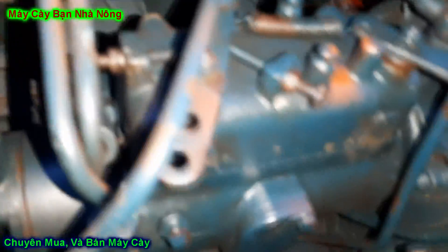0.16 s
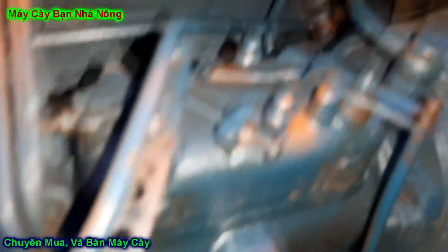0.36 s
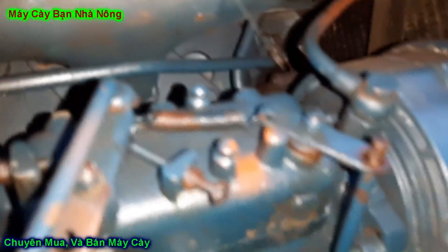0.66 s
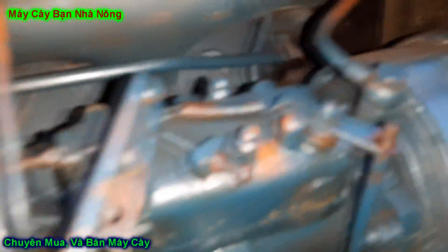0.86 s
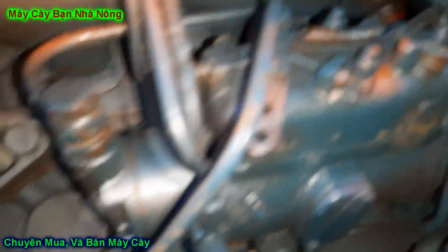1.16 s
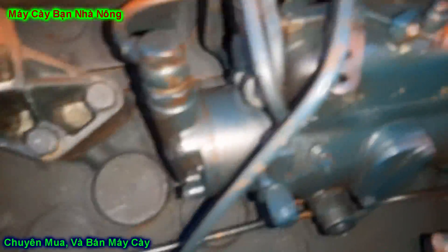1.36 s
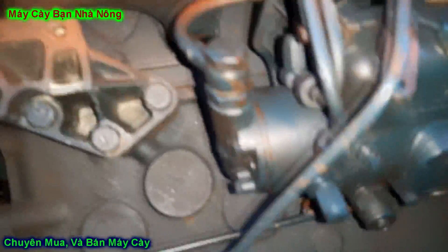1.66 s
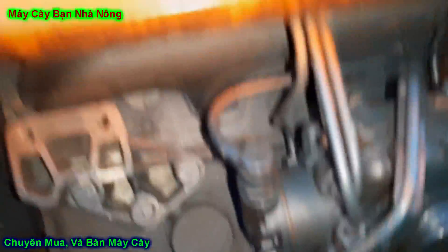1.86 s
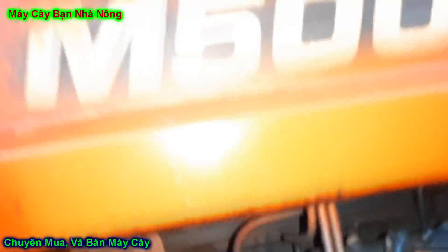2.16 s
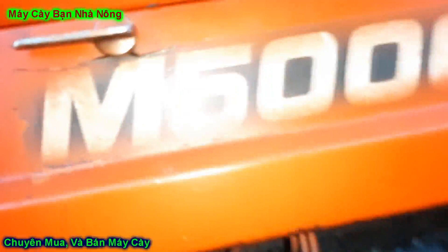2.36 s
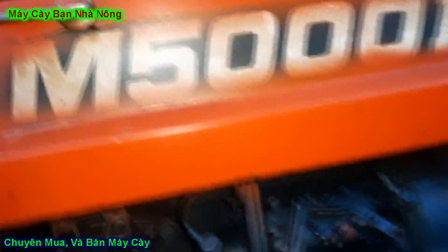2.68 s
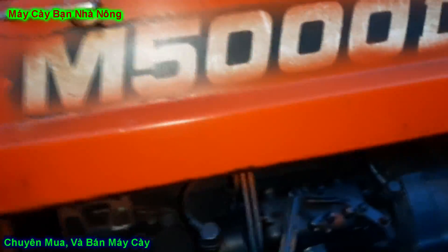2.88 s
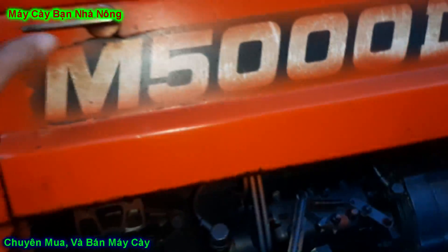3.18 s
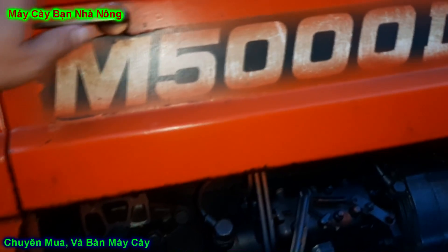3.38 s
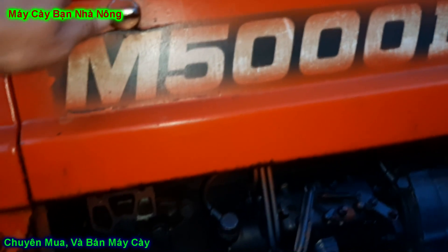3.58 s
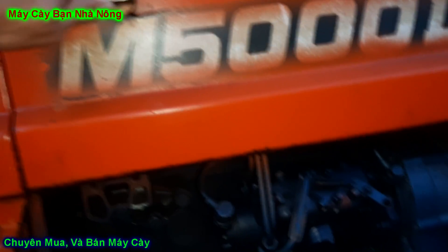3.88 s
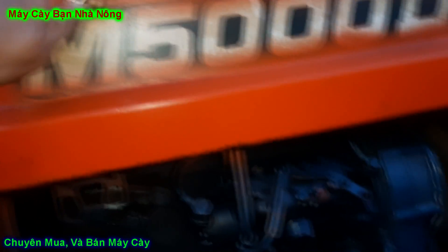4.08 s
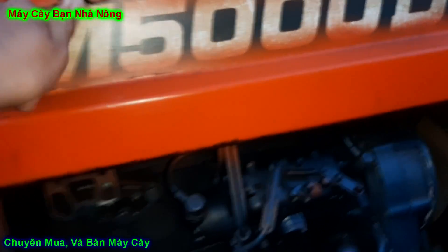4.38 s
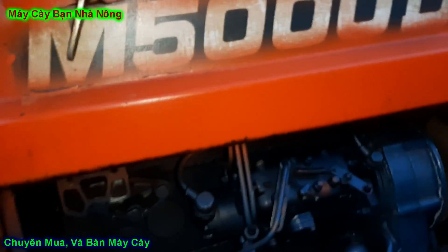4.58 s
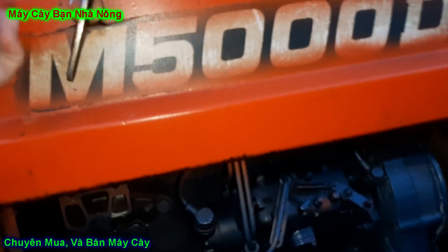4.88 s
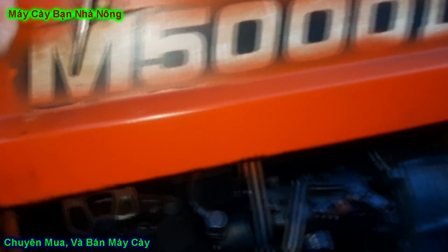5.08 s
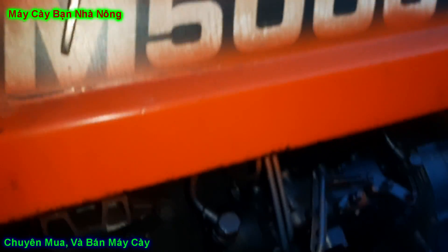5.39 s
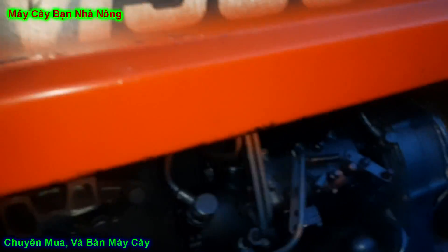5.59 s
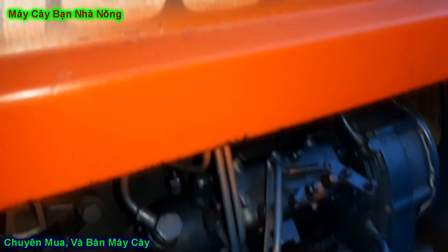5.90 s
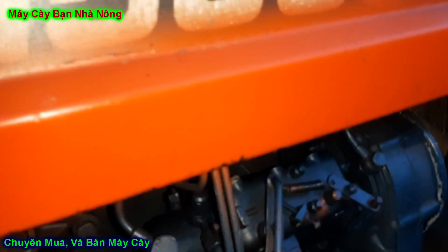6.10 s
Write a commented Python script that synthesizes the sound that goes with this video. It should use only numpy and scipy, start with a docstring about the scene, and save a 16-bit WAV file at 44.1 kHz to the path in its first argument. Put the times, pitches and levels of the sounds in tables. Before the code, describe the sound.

Close handheld stereo pickup outdoors, with a short scatter from sheds. Thin rising bird chirps recur throughout, leaning left, over distant twitter, husky fowl calls and a faint low hum. A few dry ticks and faint rustles precede one hollow, quickly damped metal knock past the middle. A much fainter tap follows, then a crunchy scuff and low footfall close the scene.

```python
"""A farmyard in daylight, heard in stereo: filtered noise and wavering tones make a low machine rumble and yard wash
under a faint hum, twitter of short far glides and hoarse, muttering fowl (noisy lines round a throat resonance).
Early on come brushes and a faint high rattle (banded noise) and grit cracks (short bursts), then a small bird's
rising chirps, single bird notes and low thin tones of the far fowl (all near-pure tones). From about 4 s a hand
knocks on a sheet-metal hood (ringing modes); near 6 s a shoe scuffs and lands on grit with a low thud (banded
noise and bursts). Sheds and machines scatter the sounds as a short noise tail."""
import sys
import numpy as np
from scipy import signal
from scipy.fft import rfft, irfft
from scipy.io import wavfile

SR = 44100
rng = np.random.default_rng(int(sys.argv[2]) if len(sys.argv) > 2 else 0)


def put_to_file(sound):
    """Save the sound as 16-bit audio at rate SR, in the file named by the first command-line argument."""
    columns = np.atleast_2d(sound).T  # one column per channel
    safe = np.clip(columns, -1, 1)
    whole_steps = np.round(safe * 32767)
    wavfile.write(sys.argv[1], SR, whole_steps.astype(np.int16))


N = 275272

# the small bird's rising chirps, one curve each: (t/s, f/Hz, level/dB)
CHIRP_CURVES = [
    [(0.357, 3560, -53), (0.38, 3870, -64.0), (0.404, 4120, -64.0), (0.429, 4430, -57), (0.452, 4800, -67),
     (0.476, 4880, -59), (0.501, 5380, -57), (0.523, 6050, -61), (0.546, 6770, -52.5)],
    [(0.718, 4110, -69), (0.739, 4300, -57), (0.762, 4530, -62.0), (0.785, 4740, -64), (0.806, 4910, -75),
     (0.83, 5300, -54), (0.853, 5280, -67), (0.874, 6040, -69), (0.895, 6620, -66.0)],
    [(1.121, 3350, -66), (1.15, 3790, -66), (1.181, 4090, -65), (1.212, 4400, -71), (1.24, 4690, -73),
     (1.272, 4880, -65.0), (1.303, 5200, -65), (1.331, 6000, -68), (1.36, 6600, -67.5)],
    [(1.457, 3950, -73.0), (1.478, 4120, -70), (1.502, 4290, -65), (1.525, 4604, -65), (1.546, 4890, -62),
     (1.569, 5240, -59.0), (1.592, 5540, -57.0), (1.614, 5870, -65), (1.635, 6100, -55)],
    [(2.213, 4214, -58.0), (2.232, 4340, -59.0), (2.252, 4570, -60), (2.273, 4820, -65), (2.292, 5090, -62),
     (2.312, 5310, -62), (2.332, 5890, -64), (2.351, 6340, -65), (2.37, 6820, -72)],
    [(2.516, 3330, -70), (2.54, 3720, -57.5), (2.566, 4046, -59), (2.592, 4230, -58.0), (2.616, 4510, -56),
     (2.641, 4930, -61), (2.667, 5286, -50), (2.691, 5840, -52), (2.715, 6680, -50.5)],
    [(2.722, 3860, -62.0), (2.74, 4000, -50), (2.76, 4205, -65), (2.779, 4450, -56), (2.797, 4554, -68),
     (2.816, 4870, -58), (2.836, 5260, -69), (2.854, 5890, -60), (2.872, 6400, -64)],
    [(3.223, 4060, -54), (3.246, 4250, -58), (3.27, 4500, -59.0), (3.295, 4710, -55), (3.318, 4640, -70),
     (3.342, 4800, -66), (3.367, 5100, -64), (3.389, 6000, -54), (3.412, 6410, -57.0)],
    [(3.662, 4400, -64.0), (3.674, 4370, -63), (3.688, 4690, -68.0), (3.701, 5170, -69.0),
     (3.713, 5530, -65), (3.726, 6060, -61), (3.74, 6170, -58), (3.752, 6610, -56), (3.764, 7230, -63)],
    [(4.386, 3530, -62), (4.409, 3700, -65), (4.433, 4070, -59), (4.458, 4520, -52), (4.48, 4700, -51),
     (4.505, 4940, -57), (4.53, 5300, -58), (4.552, 6170, -58), (4.575, 7080, -52)],
    [(4.937, 4130, -67.0), (4.949, 4230, -70), (4.963, 4550, -62), (4.976, 4710, -65.0), (4.988, 4830, -64),
     (5.002, 5020, -65.0), (5.015, 5340, -68), (5.028, 5880, -59), (5.04, 6300, -55)],
    [(5.066, 3530, -57), (5.092, 3820, -61), (5.12, 4110, -57), (5.148, 4380, -60), (5.174, 4650, -57.0),
     (5.201, 4800, -53.5), (5.229, 5210, -59), (5.255, 5970, -63), (5.281, 6650, -56)],
    [(5.242, 3370, -58), (5.266, 3750, -56.5), (5.293, 4070, -56), (5.319, 4370, -63), (5.344, 4550, -56),
     (5.37, 4840, -48.5), (5.396, 5220, -56), (5.421, 5810, -53), (5.445, 6760, -54.0)],
]


def from_db(db):
    """Decibels to an amplitude factor."""
    return 10 ** (np.asarray(db) / 20)


def rms_one(x):
    """Scale to an rms of 1."""
    return x / np.sqrt(np.mean(x ** 2) + 1e-20)


def in_time(rows):
    """Table columns joined by straight lines in time."""
    s, *columns = np.transpose(rows)
    return [np.interp(np.arange(N) / SR, s, column) for column in columns]


def at_hz(points, hz):
    """Read a curve at a frequency, straight over log frequency."""
    curve_hz, values = np.array(points)[:, 0], np.array(points)[:, 1]
    return np.interp(np.log(hz), np.log(np.maximum(curve_hz, 1)), values)


def drift(rate_hz):
    """Random wander of rms about 1: coarse noise through two equal one-pole low-passes at rate_hz."""
    step = 40  # samples between coarse points
    r = np.exp(-2 * np.pi * rate_hz * step / SR)
    coarse = rng.standard_normal(N // step + 2002)
    slow = signal.lfilter([1], [1, -2 * r, r * r], coarse)[2000:]  # skip the filter's settling
    return np.interp(np.arange(N) / step, np.arange(len(slow)), rms_one(slow))


def wavering(hz, width_hz):
    """A narrow band of noise around one pitch: two drifting amplitudes in quadrature; rms 1."""
    turn = 2 * np.pi * hz * np.arange(N) / SR
    return rms_one(drift(width_hz) * np.sin(turn) + drift(width_hz) * np.cos(turn))


def banded_noise(spectrum, patchy_db, flicker_hz):
    """Diffuse stereo noise in third-octave bands, each with its own level, flicker and likeness; rms 1."""
    # left-right correlation of the diffuse field: (f/Hz, likeness from -1 to 1)
    likeness = [(60, 1), (130, 0.95), (290, 0.84), (640, 0.05), (1410, -0.33), (3100, -0.044),
                (6820, -0.085), (15000, 0.015)]
    lowest, highest = spectrum[0][0], spectrum[-1][0]
    edges = np.geomspace(lowest, highest, round(3 * np.log2(highest / lowest)) + 1)
    out = 0
    white = rng.standard_normal((2, 2, N))  # neighbouring bands draw on different noise
    for k, (low, high) in enumerate(zip(edges, edges[1:])):
        band = signal.butter(2, [low, high], "band", fs=SR, output="sos")
        mid, side = signal.sosfilt(band, white[k % 2])
        hz = np.sqrt(low * high)
        alike = np.clip(at_hz(likeness, hz), -1, 1)
        gain = from_db(at_hz(spectrum, hz) + patchy_db * drift(flicker_hz))
        out = out + gain * (np.sqrt(1 + alike) * mid + np.sqrt(1 - alike) * side * [[1], [-1]])
    return rms_one(out)


def piping(calls, flutter_db, waver, grain_db):
    """Near-pure tones; leaves and sheds on the way flutter level and pitch, and a fast rasp roughens them."""
    out = np.zeros(N)
    flutter, wobble, rasp = drift(60), drift(90), drift(260)
    for call in calls:
        a, b = round(call[0][0] * SR), min(round(call[-1][0] * SR), N)
        t = np.arange(a, b) / SR
        s, hz, db = np.transpose(call)
        pitch_hz = np.interp(t, s, hz) * (1 + waver * wobble[a:b])
        phase = 2 * np.pi * np.cumsum(pitch_hz) / SR
        fade = np.clip(np.minimum((t - s[0]) / .016, (s[-1] - t) / .008), 0, 1)  # 16 ms in, 8 ms out
        level_db = np.interp(t, s, db) + flutter_db * flutter[a:b] + grain_db * rasp[a:b]
        out[a:b] += fade * from_db(level_db) * np.sqrt(2) * np.sin(phase)
    return out


def drone():
    """The far machine's tones, each a narrow wavering band, alike at both ports."""
    # tones: (f/Hz, width/Hz, level/dB re the rumble noise)
    machine_tones = [(66.1, 6.6, -14), (100.8, 3.4, -13), (126.1, 3.16, -4), (383, 10, -22.5)]
    return sum(from_db(db) * wavering(hz, width_hz) for hz, width_hz, db in machine_tones)


def machine_rumble(level_db):
    """Low diffuse noise with the machine's tones inside it, swelling together."""
    # noise colour: (f/Hz, relative density/dB per Hz)
    rumble_colour = [(12, -77), (25, -29), (53, -8), (128, 6.5), (143, 5), (199, -5), (260, -35),
                     (340, -30.5), (570, -120)]
    return from_db(level_db) * (banded_noise(rumble_colour, patchy_db=1.0, flicker_hz=2.8) + drone())


def yard_wash(level_db):
    """The yard's mid-range wash: diffuse noise with slowly flickering bands."""
    # noise colour: (f/Hz, relative density/dB per Hz)
    wash_colour = [(110, -40), (190, -7), (303, -3), (433, -4), (477, -6), (591, -4.5), (724, -15),
                   (964, -11), (1200, -13), (1910, -11), (3300, -31.5), (4290, -52), (7260, -120)]
    return from_db(level_db) * banded_noise(wash_colour, patchy_db=2.5, flicker_hz=3.7)


def twitter_bed(level_db):
    """Twitter blurred into a diffuse treble noise whose bands flicker fast."""
    # noise colour: (f/Hz, relative density/dB per Hz)
    twitter_colour = [(1530, -85), (2600, 7), (3280, 4), (4540, 8.5), (6090, 0.5), (7050, 3), (8250, -43.5),
                      (9500, -21), (12400, -63), (20900, -120)]
    return from_db(level_db) * banded_noise(twitter_colour, patchy_db=3.0, flicker_hz=22.0)


def hiss():
    """A steady faint hiss of diffuse treble noise."""
    # noise colour: (f/Hz, relative density/dB per Hz)
    hiss_colour = [(4410, -6), (7500, -6.5), (8190, -51), (9350, -30), (11000, -17), (13000, -16.5),
                   (15900, -19.5)]
    return from_db(-69) * banded_noise(hiss_colour, patchy_db=1.5, flicker_hz=8.3)


def hum():
    """A faint wavering hum, a narrow noise band that swells, sinks almost away and creeps back."""
    # fader moves: (t/s, level/dB)
    hum_fader = [(0, -69.5), (.3, -67.5), (1.0, -75), (1.5, -65.5), (2.0, -78), (2.6, -88), (6.24, -77)]
    level_db, = in_time(hum_fader)
    return from_db(level_db) * wavering(hz=585, width_hz=31)


def flock(count):
    """Far sparrows: short glides up or down at random moments, within a few dB of each other; rms 1."""
    # start s, length s, start Hz, end/start pitch ratio, level dB
    spans = [N / SR - .1, .04, 2300, .4, 5]
    lowest = [0, .02, 3600, .82, 0]
    draws = rng.random((count, 5)) * spans + lowest
    calls = [[(s, hz, db), (s + length, hz * glide, db)] for s, length, hz, glide, db in draws]
    return rms_one(piping(calls, flutter_db=3, waver=.02, grain_db=4))


def hoarse(hz, low_db):
    """A husky voice: wavering lines round the throat resonance in a band of breath, and a low partial."""
    turn = 2 * np.pi * np.cumsum(hz) / SR

    def line(ratio, rate_hz):
        return rms_one(drift(rate_hz) * np.sin(ratio * turn) + drift(rate_hz) * np.cos(ratio * turn))

    core, upper, lower = line(.95, 30), line(1.09, 40), line(.84, 40)
    breath = line(1.0, 320)
    low = line(.4, 40)  # more than an octave below
    lines = from_db(-8) * core + from_db(-11) * (upper + lower)
    return lines + from_db(-6.5) * breath + from_db(low_db - 10.0) * low


def fowl():
    """Far hoarse calls swell, hold and die away, gliding in pitch; the flock mutters on below."""
    # calls: (start t/s, length/s, throat f/Hz at start, f/Hz at end, relative level/dB,
    #         relative low-partial level/dB)
    fowl_calls = [(0.235, 0.11, 2710, 2704, -59, -20), (0.444, .16, 2345, 2294, -68, -10),
                  (0.666, 0.2, 2297, 2412, -64, 10), (0.847, 0.23, 2703, 2597, -71, -20),
                  (1.201, 0.18, 2566, 2500, -61.5, -11), (1.5, 0.17, 2277, 2010, -58.5, 5),
                  (1.658, 0.19, 2253, 2148, -59.5, -3), (1.899, 0.32, 1748, 1801, -55, -5),
                  (2.134, 0.33, 1954, 2033, -55.5, -12), (2.499, 0.4, 1994, 1780, -54.5, -23),
                  (2.818, 0.32, 1669, 1698, -56.5, -26), (3.816, 0.14, 1830, 1760, -57, -14),
                  (4.744, 0.11, 2250, 2237, -59.5, -10), (4.904, 0.15, 1938, 2160, -56.5, -18),
                  (5.123, 0.17, 2260, 1830, -81, 9), (6.13, 0.14, 1550, 1640, -64, -5)]
    attack_s, release_s = 0.12, 0.24
    t, gain = np.arange(N) / SR, np.zeros(N)
    s, length, from_hz, to_hz, db, low_db = np.transpose(fowl_calls)
    for start, end, top in zip(s, s + length, from_db(db)):
        ramp = np.minimum((t - start) / attack_s, (end - t) / release_s)
        swell = np.clip(ramp + .5, 0, 1) ** 2  # ramps are half-way up at start and end
        gain = np.maximum(gain, top * swell)
    ends = np.ravel([s, s + length - 1e-3], "F")
    throat_hz = np.interp(t, ends, np.ravel([from_hz, to_hz], "F"))
    calls = gain * hoarse(throat_hz, np.interp(t, ends, np.repeat(low_db, 2)))
    mutter = hoarse(2137 * (1 + .08 * drift(4)), low_db=7.0)
    mutter_db = -72 + 5 * drift(3.3)
    return calls + from_db(mutter_db) * mutter


def noise_swells():
    """Brushes, scuffs, a faint high rattle and a low thud: filtered noise under a smooth swell."""
    # swells: (middle t/s, length/s, rms level at the top/dB, centre f/Hz, width/octaves)
    swells = [(0.252, 0.081, -75, 11000, 0.3), (.62, 1, -75.5, 10500, 0.16),
              (1.587, 0.19, -68.5, 10800, 0.85), (2.048, 0.39, -66, 11640, 1.6),
              (2.8, 0.61, -74.5, 12100, 0.23), (3.996, 0.081, -62.5, 11900, 0.22),
              (3.947, 0.02, -55, 1190, 0.32), (3.98, 0.1, -58.5, 3500, 0.81),
              (4.268, 0.095, -63.5, 11340, 0.3), (5.135, 0.03, -53, 1169, 1.7),
              (5.959, 0.069, -50.5, 1010, 1.05), (5.96, 0.035, -55.5, 8000, 2.6),
              (5.993, 0.053, -40.5, 243, 0.15), (5.996, 0.036, -48, 1150, 0.26),
              (5.997, 0.025, -50, 3070, 0.67), (6.015, 0.076, -47.5, 637, 0.15),
              (5.96, 0.056, -60, 1490, 0.18)]
    t, out = np.arange(N) / SR, np.zeros(N)
    grains = rng.standard_normal(N) * from_db(2.0 * drift(90))
    for s, length, db, centre_hz, octaves in swells:
        near = np.abs(t - s) < 1.5 * length
        count = near.sum()
        octaves_off = np.log2((np.fft.rfftfreq(count, 1 / SR) + 1) / centre_hz)
        colour = np.exp(-.5 * (octaves_off / octaves) ** 2)
        filtered = rms_one(irfft(rfft(grains[near]) * colour, count))
        swell = np.exp(-.5 * ((t[near] - s) / (length / 2.4)) ** 2)
        out[near] += from_db(db) * swell * filtered
    return out


def ticks():
    """Grit cracks: a band-passed noise burst that dies within milliseconds."""
    # cracks: (t/s, relative level/dB, decay to 1/e in ms)
    cracks = [(.232, -60, 1.0), (.579, -54, 1.0), (1.1356, -39, 1.4), (2.771, -37, 1.5),
              (5.9566, -32, 1.29), (5.962, -36, 1.5), (5.9823, -26.5, 4.5), (6.2273, -33.5, 0.84)]
    out, t_ms = np.zeros(N), np.arange(900) / SR * 1000
    for s, db, decay_ms in cracks:
        at = round(s * SR)
        burst = rng.standard_normal(len(t_ms)) * np.exp(-t_ms / decay_ms) * from_db(db - 5)
        out[at:at + len(t_ms)] += burst[:N - at]
    return signal.lfilter(*signal.butter(1, [900, 6000], "band", fs=SR), out)


def chirps():
    """Each chirp climbs slowly, flicks up to its top and slips down again in a fainter husky blur."""
    drop_s, drop_ratio, drop_db = 0.035, 0.51, -3
    climbs = piping(CHIRP_CURVES, flutter_db=2, waver=.011, grain_db=3.5)
    drops = [[(s, hz, db + drop_db), (s + drop_s, hz * drop_ratio, db + drop_db - 8.5)]
             for *_, (s, hz, db) in CHIRP_CURVES]
    return climbs + piping(drops, flutter_db=3, waver=.05, grain_db=5)


def single_notes():
    """Single notes of birds, and low thin tones of the far fowl: near-pure tones on straight glides."""
    # notes: (start t/s, length/s, start f/Hz, end f/Hz, level/dB)
    glides = [(.39, .025, 5150, 5180, -68), (1.4, 0.08, 592, 605, -68), (1.73, .24, 815, 800, -72),
              (2.01, .09, 810, 790, -72), (1.749, .16, 1615, 1620, -71), (2.11, 0.19, 725, 690, -67),
              (1.885, .07, 5420, 5420, -66), (1.97, .28, 5480, 5620, -72), (2.015, .05, 4800, 4450, -66),
              (3.522, 0.045, 5600, 5950, -64), (3.532, .05, 6200, 6400, -64), (1.95, .07, 1700, 1640, -66),
              (2.62, .1, 1830, 1790, -65), (2.66, .07, 2010, 1990, -66), (2.93, .1, 1620, 1590, -66),
              (3.667, 0.1, 3850, 3510, -70), (3.652, .035, 4450, 4200, -63), (4.35, .045, 3950, 4600, -65),
              (5.44, .08, 2950, 2540, -74), (5.79, 0.064, 4500, 6240, -69), (6.012, 0.025, 4700, 5250, -59),
              (6.09, .075, 1510, 1540, -63), (6.17, .06, 1500, 1560, -66), (6.13, 0.022, 3330, 4480, -61)]
    calls = [[(s, hz, db), (s + length, end_hz, db)] for s, length, hz, end_hz, db in glides]
    return piping(calls, flutter_db=2.5, waver=.011, grain_db=3.5)


def knocks():
    """A soft push rings every panel mode; neighbours start in opposite sense, so the pair swells."""
    # hits on the hood: (t/s, relative level/dB, contact time/ms)
    hits = [(3.9345, -29, 2.08), (3.953, -55, 0.66), (3.997, -42.5, 1.77), (4.019, -41, 2.2),
            (5.192, -51, 1.3), (5.938, -48, 0.68), (5.978, -44, 2.4), (5.987, -41, 0.54),
            (6.006, -48, 0.94), (6.039, -52.5, 0.86)]
    # ringing modes of the sheet metal: (f/Hz, relative level/dB, time to fall 60 dB/s)
    hood_modes = [(244, -5, 0.13), (321, 5.5, 0.13), (364, 8.5, 0.063), (392, -1.5, 0.2), (470, 0.5, 0.093),
                  (567, 0.5, 0.09), (700, 3.5, 0.044), (794, -4.5, 0.2), (904, 4, 0.066), (1020, -4, 0.069),
                  (1170, 5, 0.031), (1330, 1, 0.11), (1710, -31, 0.044)]
    out = np.zeros(N)
    for k, (hz, mode_db, t60) in enumerate(hood_modes):
        push = np.full(N, 1e-18)
        for s, db, contact_ms in hits:
            contact = np.hanning(max(round(contact_ms * SR / 1000), 3))
            at = round(s * SR)
            strength_db = db + mode_db - 2 + rng.normal(0, 1.0)  # each hit excites the modes a little differently
            push[at:at + len(contact)] += contact / contact.sum() * from_db(strength_db)
        r, w = from_db(-60 / (t60 * SR)), 2 * np.pi * hz / SR
        ring = signal.lfilter([0, np.sin(w)], [1, -2 * r * np.cos(w), r * r], push)
        out += (-1) ** k * ring
    return signal.lfilter(*signal.butter(2, 120, "high", fs=SR), out)


def place(x, pan_db, lag):
    """A point source: left-minus-right level in dB, and the left port late by lag samples."""
    n = np.arange(N)
    left = np.interp(n - lag / 2, n, x) * from_db(pan_db / 2)
    right = np.interp(n + lag / 2, n, x) / from_db(pan_db / 2)
    return np.array([left, right])


def echoes(x):
    """Scatter from sheds and machines: a dying noise tail, alike at both ports in the bass only."""
    t60_s, onset_s = 0.24, 0.0031
    t = np.arange(round(.5 * SR)) / SR
    shared, *own = rng.standard_normal((3, len(t)))
    bass, treble = [signal.butter(2, 550, kind, fs=SR) for kind in ("low", "high")]
    tail = signal.lfilter(*bass, shared) + signal.lfilter(*treble, own)
    tail = tail * from_db(-60 * t / t60_s) * np.clip(t / onset_s, 0, 1)
    tail = tail / np.sqrt(np.sum(tail ** 2, axis=1, keepdims=True))  # unit energy per port
    return signal.fftconvolve(x[None], tail, axes=1)[:, :N]


def scene():
    """Diffuse background, placed sources and their scatter, summed in stereo."""
    # background swell: (t/s, then relative levels/dB of rumble, yard wash and twitter)
    yard_swell = [(0.0, -47, -64, -64), (0.2, -50, -63.5, -60.5), (0.5, -46.5, -62, -61.5),
                  (1.0, -51.5, -63.5, -62.5), (1.3, -48.5, -62.5, -63), (1.8, -46, -60.5, -62),
                  (2.4, -52.5, -59.5, -59), (2.71, -49, -59.5, -61.5), (3.13, -49, -59, -61),
                  (3.4, -50, -62, -63), (3.75, -51, -59, -60.5), (4.03, -48, -56, -61),
                  (4.2, -50, -57, -58.5), (4.8, -53.5, -57.5, -60.5), (5.02, -50.5, -62, -60),
                  (5.23, -49, -56, -57.5), (5.47, -52, -58, -60.5), (6.24, -49, -55.5, -60.5)]
    rumble_db, wash_db, twitter_db = in_time(yard_swell)
    background = machine_rumble(rumble_db - 2.0) + yard_wash(wash_db + 1.5) + twitter_bed(twitter_db) + hiss()
    far = from_db(twitter_db - 7) * flock(count=700)
    hens = fowl()
    near = noise_swells() + ticks()
    tones = chirps() + single_notes()
    blows = knocks()
    direct = (place(hens, pan_db=-4.5, lag=-19.0) + place(near, pan_db=-2.0, lag=1.0)
              + place(tones, pan_db=-6.0, lag=-15.5) + place(blows, pan_db=-2.0, lag=-1.0))
    # the far flock is heard through the scatter alone
    scattered = (far + from_db(-6) * hens + from_db(-9) * near
                 + from_db(-1.2) * tones + from_db(-3.5) * blows)
    return background + hum() + direct + echoes(scattered)


def record(dry):
    """A steep low-pass cuts the top, 60 dB down from 16 kHz."""
    return signal.sosfilt(signal.cheby2(20, 60, 16000, fs=SR, output="sos"), dry)


dry = scene()
out = record(dry)
put_to_file(out)
```